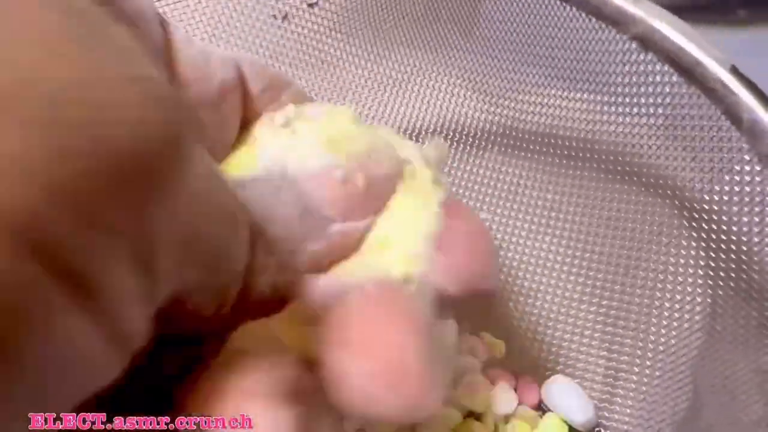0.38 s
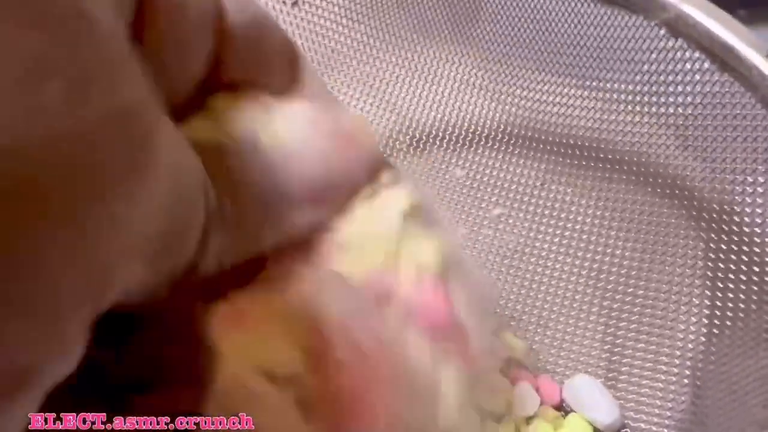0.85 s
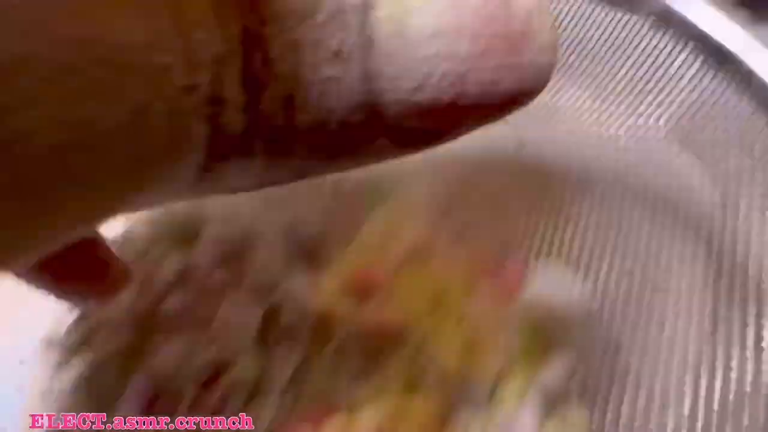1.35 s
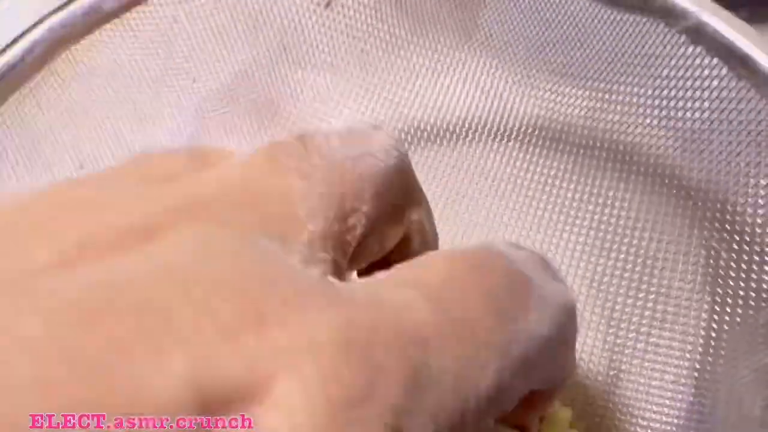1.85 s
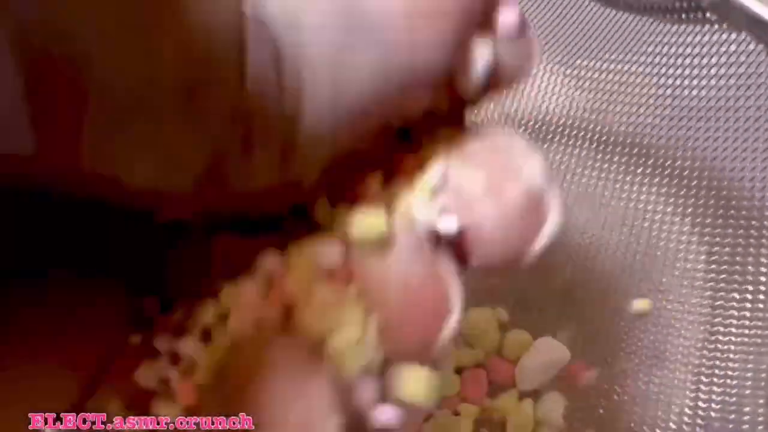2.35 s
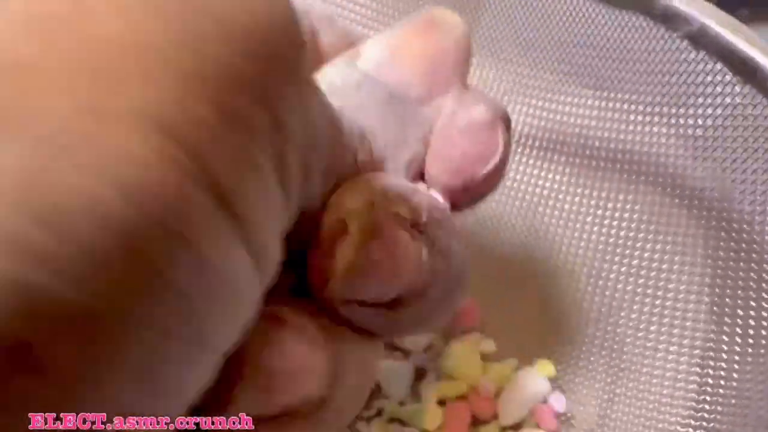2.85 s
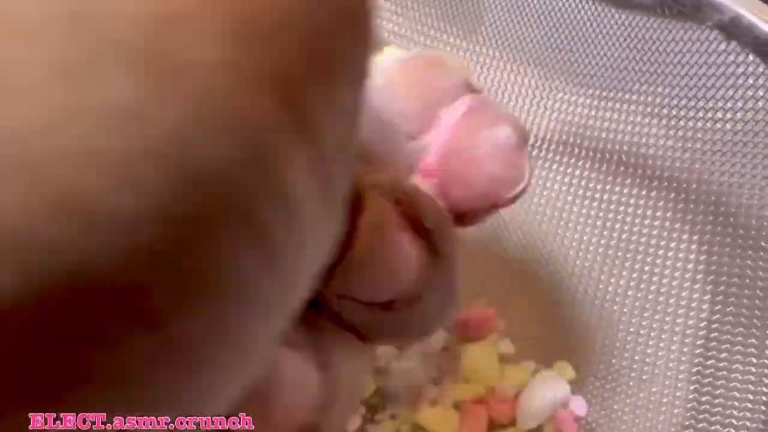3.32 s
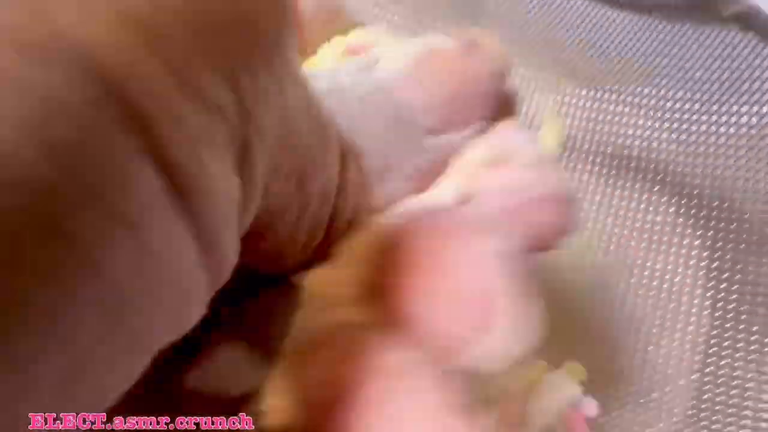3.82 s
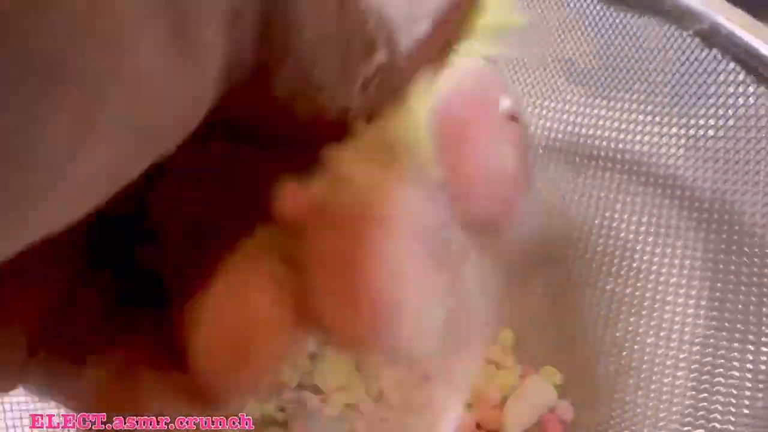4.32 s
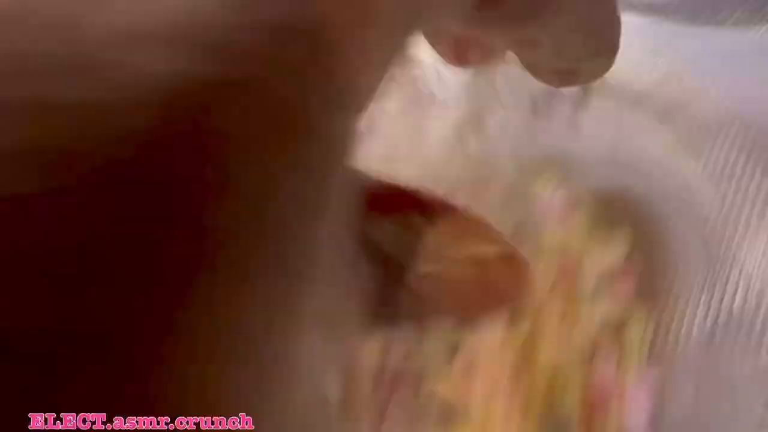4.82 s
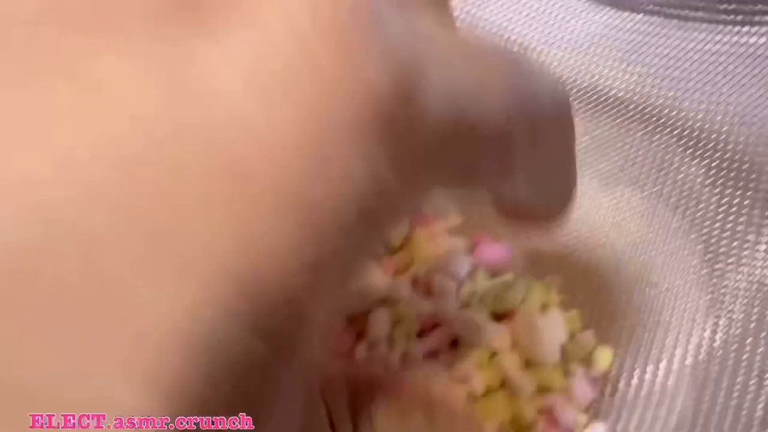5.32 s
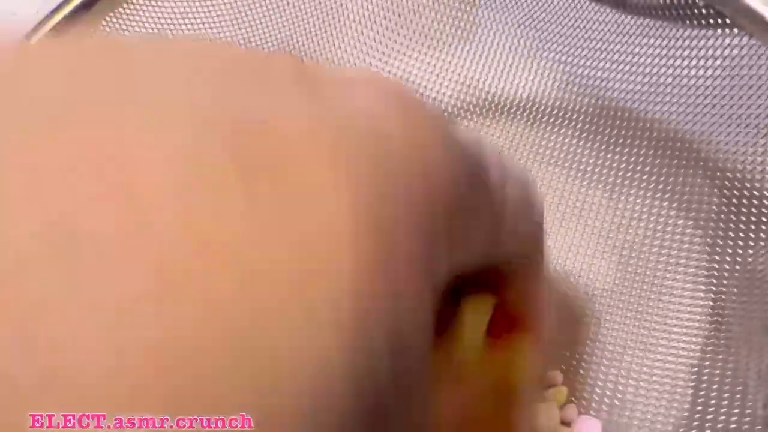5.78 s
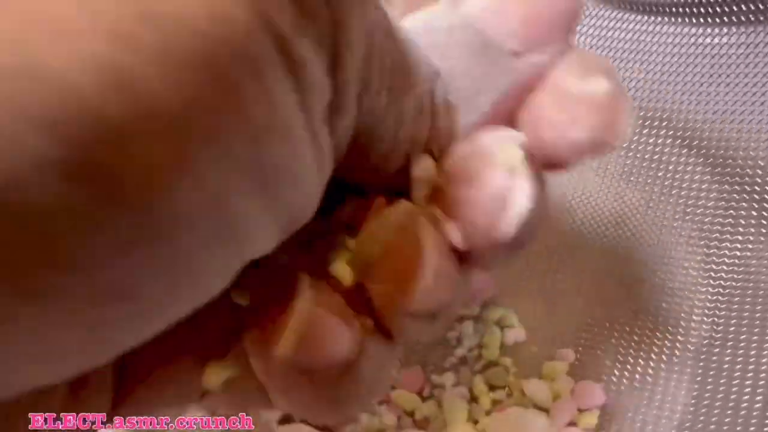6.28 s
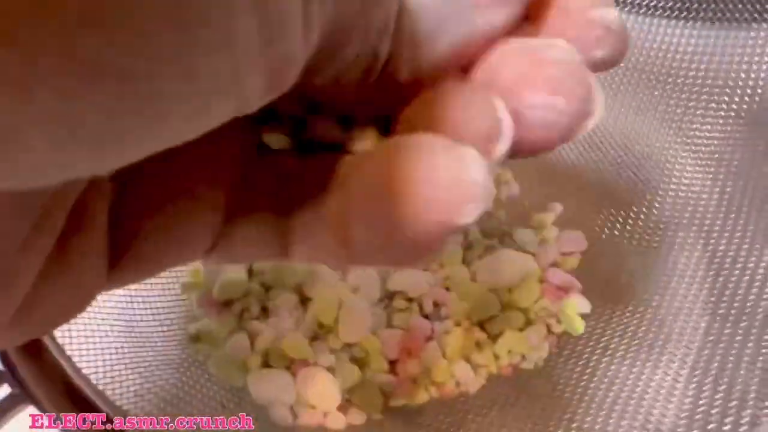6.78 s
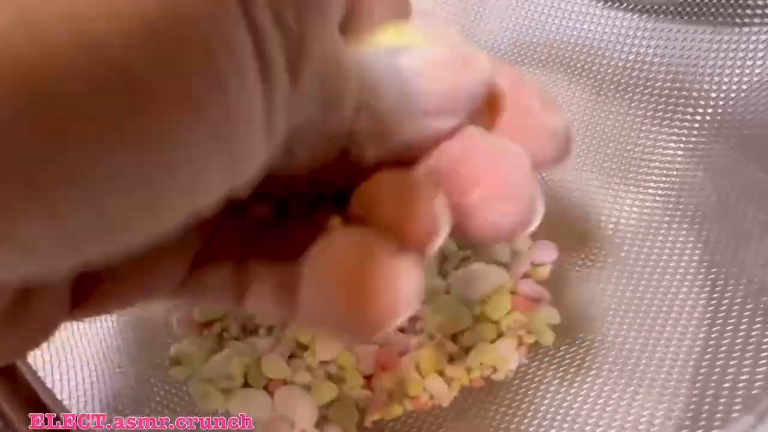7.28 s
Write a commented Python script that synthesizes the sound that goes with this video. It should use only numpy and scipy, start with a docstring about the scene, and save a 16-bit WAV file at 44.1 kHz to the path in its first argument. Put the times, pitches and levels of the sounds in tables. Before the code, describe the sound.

Very close, irregular crunches of chalky pieces crushed by fingers, mostly left, with hissing crumb showers on metal mesh and soft low bumps.

```python
"""Fingers crush dry, brittle lumps over a wire strainer close to a pair of microphones.
From the start, mains hum and a low rumble lie under crumbs pattering and sliding on the mesh (resonated clicks);
from 0.07 s single crumbs tick on the wires (noise bursts), and from 0.25 s the hand bumps the frame (damped sines).
From 0.9 s lumps crack in the hand, mostly at the left; hard showers fall near 1.4 s, dense cracks near 2.6 s.
A milder shower peaks near 4.9 s, strong cracks near 6.3 s; squeezing goes on to the end as the hum swells again."""
import sys
import numpy as np
from scipy import signal
from scipy.fft import rfft, irfft
from scipy.io import wavfile
from scipy.ndimage import uniform_filter1d, map_coordinates

SR = 44100
rng = np.random.default_rng(int(sys.argv[2]) if len(sys.argv) > 2 else 0)


def wav_record(signal):
    """Record a signal, one row per channel, as 16-bit PCM in the file named by sys.argv[1]."""
    frames = np.transpose(np.atleast_2d(signal))
    bounded = np.clip(frames, -1, 1)
    # unit amplitude maps onto the largest positive 16-bit level
    quanta = np.round(bounded * 32767).astype(np.int16)
    wavfile.write(sys.argv[1], SR, quanta)


def gain_from_decibels(decibels):
    """Convert decibel values to linear amplitude factors."""
    exponent = np.asarray(decibels, float) / 20
    return 10 ** exponent


N = 337365

# Single crumbs landing on the wires. Each row: start in seconds, snap level in dB before trim,
# level of the following scatter against it in dB.
TICKS = [(0.0673, -36, -14), (0.231, -36, -9), (0.605, -32, -30), (0.6609, -41, -11), (0.724, -39, -14),
         (1.2256, -20, -15), (1.946, -24.5, -14.5), (2.381, -27, -20), (2.484, -26.5, -29),
         (2.545, -31, -8), (2.7773, -32, -26), (2.8225, -48, -14), (2.973, -41, -13), (3.067, -31, -11),
         (3.283, -27, -15), (3.3368, -24, -30), (3.53, -45, -7.5), (3.58, -38, -21), (3.6167, -46, -19),
         (3.714, -25, -8), (3.8303, -34, -12), (4.0802, -32, -23), (4.119, -41, -18), (4.177, -41, -7),
         (4.2153, -32, -16), (4.2728, -31, -20), (4.2984, -38, -24), (4.358, -32.5, -18),
         (4.3994, -40, -10), (4.704, -40, -11), (4.8347, -26, -16), (5.3098, -42, -14),
         (5.4306, -38, -17.5), (6.0023, -38.5, -17), (6.1584, -38, -14), (6.277, -35, -25),
         (6.429, -38, -29), (6.455, -30.5, -14), (6.63, -33.5, -30), (6.9564, -34, -26.5),
         (7.008, -38, -15), (7.1755, -41, -16), (7.231, -36.5, -17), (7.532, -41.5, -4)]


def rms_one(x):
    """Scale to rms 1."""
    return x / np.sqrt(np.mean(x ** 2) + 1e-20)


def in_time(rows):
    """Interpolate each column over time, sample by sample."""
    s, *columns = np.transpose(rows)
    return [np.interp(np.arange(N) / SR, s, column) for column in columns]


def at_hz(points, hz):
    """Read a table on a log-frequency axis."""
    table_hz, value = np.transpose(points)
    return np.interp(np.log(hz), np.log(table_hz), value)


def drift(rate_hz):
    """Slow random curve with rms 1: noise through a two-pole lowpass."""
    r = np.exp(-2 * np.pi * rate_hz / SR)
    slow = signal.lfilter([1], [1, -2 * r, r * r], rng.standard_normal(N + SR))
    return rms_one(slow[SR:])   # the filter's first second is dropped


def swells(rows, rest_db, rest_value=0):
    """Events rising to a peak and falling add their power; a last column is blended by each event's share."""
    roundness = 1.6   # 1 = pointed, 2 = bell-shaped
    t = np.arange(0, N + 64, 64) / SR
    columns = np.array([(*row, 0)[:5] for row in rows]).T
    peak_s, peak_db, rise_ms, fall_ms, value = columns[:, :, None]
    late_ms = 1000 * (t - peak_s)
    distance = np.where(late_ms < 0, -late_ms / rise_ms, late_ms / fall_ms) ** roundness
    power = gain_from_decibels(2 * (peak_db - 10 * np.minimum(distance, 20)))
    rest_power = gain_from_decibels(2 * rest_db)
    total = power.sum(axis=0) + rest_power
    blend = ((power * value).sum(axis=0) + rest_power * rest_value) / total
    return [np.interp(np.arange(N) / SR, t, v) for v in (10 * np.log10(total), blend)]


def ring(clicks, hz, cycles):
    """Two-pole resonator: falls 60 dB in the given cycles, gain about 1 at its peak."""
    r, w = gain_from_decibels(-60 * hz / (cycles * SR)), 2 * np.pi * hz / SR
    b = [(1 - r * r) / 2, 0, (r * r - 1) / 2]
    a = [1, -2 * r * np.cos(w), r * r]
    return signal.lfilter(b, a, clicks + 1e-18)


def grains(spectrum, per_s, spread_db, cycles, clump_db, clump_rate_hz, count, weight_db):
    """Random clicks in clumps, each dealt to one of many small resonators; levelled to a running rms of 1."""
    sizes = gain_from_decibels(spread_db * np.minimum(rng.exponential(1, N), 4)) * rng.choice([-1, 1], N)
    struck_now = rng.random(N) < per_s / SR
    clicks = sizes * struck_now * gain_from_decibels(clump_db * drift(clump_rate_hz))
    dealt, out = rng.integers(0, count, N), 0
    for k, hz in enumerate(np.geomspace(spectrum[0][0], min(spectrum[-1][0], .4 * SR), count)):
        once = ring(clicks * (dealt == k) * gain_from_decibels(weight_db(hz)), hz, cycles)
        out = out + gain_from_decibels(at_hz(spectrum, hz)) * ring(once, hz, cycles)   # twice: soft start, dark skirts
    return out / np.sqrt(uniform_filter1d(out ** 2, size=3000) + 1e-20)


def coloured(spectrum):
    """Two unrelated smooth noises shaped by a spectrum; rms 1 overall."""
    shape = gain_from_decibels(at_hz(spectrum, np.fft.rfftfreq(N, 1 / SR) + 1))
    return rms_one(irfft(rfft(rng.standard_normal((2, N))) * shape, N))


def placed(x, other, alike, pan_db, left_lag_s):
    """Left hears x at its own time; right hears a share of x in power, the rest from an unrelated signal."""
    left = map_coordinates(x, [np.arange(N) - left_lag_s * SR], order=3)
    right = np.sqrt(alike) * x + np.sqrt(1 - alike) * other
    return np.array([left * gain_from_decibels(pan_db / 2), right * gain_from_decibels(-pan_db / 2)])


def struck(rows, cycles, trim_db, rise_s, sharp, settle_s):
    """Each hit is a damped sine starting sharp, since high bending waves arrive first, and settling in pitch."""
    out, t = np.zeros(N + SR), np.arange(1500) / SR
    for s, db, hz in rows:
        start = round(s * SR)
        turns = hz * (t + sharp * settle_s * (1 - np.exp(-t / settle_s)))
        shape = (1 - np.exp(-t / rise_s)) * gain_from_decibels(db + trim_db - 60 * t * hz / cycles)
        out[start:start + len(t)] += shape * np.sin(2 * np.pi * turns)
    return out[:N]


def hum():
    """Mains hum: a sine and its second harmonic with a slightly wavering pitch."""
    # Each row: time in seconds, rms level of the fundamental in dB before pan.
    hum_level = [(0.0, -47), (1.7, -46.5), (1.89, -44), (2.0, -49), (3.4, -60.5), (3.73, -55), (3.92, -62),
                 (4.81, -62), (4.92, -53), (5.18, -61.5), (5.35, -51.5), (6.03, -54.5), (6.29, -48.5),
                 (6.62, -51), (7.52, -45.5), (7.65, -50)]
    hum_hz, waver_hz, second_db = 59.3, 0.27, -21
    phase = 2 * np.pi * np.cumsum(hum_hz + waver_hz * drift(1.32)) / SR
    tone = np.sin(phase) + gain_from_decibels(second_db) * np.sin(2 * phase)
    pan = gain_from_decibels(np.array([[.6], [-.6]]))
    return np.sqrt(2) * gain_from_decibels(in_time(hum_level)[0]) * tone * pan


def patter():
    """Dense showers of crumbs excite the wires, which favour the high treble; harder showers are brighter."""
    # Mesh spectrum. Each row: frequency in Hz, relative level in dB.
    mesh = [(1500, -21), (3000, -19.5), (5000, -10), (6800, -5), (8500, -5.5), (9500, 0), (11500, -6.5),
            (14000, -5.5), (15800, -1.5)]
    # Crumbs falling or sliding. Each row: peak time in seconds, peak level in dB before pan,
    # rise over 10 dB in ms, fall over 10 dB in ms.
    showers = [(0.0, -52.5, 498, 106), (0.082, -50.5, 25, 16), (0.141, -51.4, 18, 66),
               (0.229, -44.5, 10, 474), (0.295, -41, 64, 34), (0.759, -48, 53, 49), (0.924, -43, 113, 26),
               (0.979, -43.5, 25, 401), (1.07, -41, 30, 14), (1.25, -25, 24, 63), (1.379, -23.5, 56, 30),
               (1.479, -25, 67, 31), (1.578, -33.5, 97, 30), (1.783, -32, 127, 52), (1.854, -26.5, 22, 55),
               (1.955, -35.5, 27, 51), (2.089, -39.5, 83, 323), (2.485, -43, 1, 43), (2.59, -39, 73, 103),
               (2.849, -49.5, 201, 82), (2.971, -48, 1, 77), (3.104, -39.5, 83, 102),
               (3.155, -47.5, 4, 184), (3.335, -36.5, 2, 12), (3.45, -53.5, 500, 42),
               (3.564, -51.1, 57, 29), (3.723, -37, 81, 49), (3.862, -43.5, 69, 25), (3.929, -51, 76, 142),
               (4.124, -55, 97, 6), (4.184, -51, 20, 134), (4.282, -48.5, 33, 18), (4.358, -52.5, 3, 189),
               (4.586, -46, 68, 39), (4.733, -50, 19, 378), (4.855, -27.5, 22.5, 167),
               (5.072, -34.5, 138, 158), (5.133, -31.5, 32, 24), (5.454, -33.5, 132, 82),
               (5.577, -37, 39, 57), (5.685, -44.5, 118, 318), (5.875, -44, 112, 64),
               (6.163, -47.5, 17, 223), (6.273, -44.5, 10, 49), (6.424, -59, 13, 149),
               (6.518, -52.5, 20, 70), (6.633, -47.7, 6, 13), (6.741, -40.5, 68, 101),
               (6.952, -51.5, 13, 36), (7.033, -51.6, 77, 71), (7.177, -56, 6, 26), (7.267, -44, 43, 127),
               (7.476, -52.5, 36, 169), (7.537, -51, 17, 20)]
    level_db, _ = swells(showers, rest_db=-80)   # stray crumbs between showers
    top_db = -4.5 + 0.18 * (level_db - level_db.max())   # weight of the top octave

    def bright(hz):
        return top_db * np.clip(np.log2(hz / 9000) / 0.31, 0, 1)

    pair = [grains(mesh, per_s=16000, spread_db=1.0, cycles=17.0, clump_db=2.5, clump_rate_hz=14.0,
                   count=24, weight_db=bright) for _ in range(2)]
    return gain_from_decibels(level_db) * placed(*pair, alike=0.073, pan_db=4.5, left_lag_s=0.00023)


def crush():
    """Small fractures coloured by the hollow of the hand, which changes as it closes; plus loud cracks."""
    # Lump spectrum. Each row: frequency in Hz, relative level in dB.
    lump = [(700, -24), (1200, -9), (2000, -6), (3500, -9), (5000, -10.5), (8000, -35)]
    # Squeezes of the fist. Each row: peak time in seconds, peak level in dB before pan,
    # rise over 10 dB in ms, fall over 10 dB in ms, centre of the hand hollow in Hz.
    squeezes = [(0.001, -55.5, 6, 84, 2772), (0.233, -46, 11, 127, 3050), (0.465, -54.5, 4, 86, 2299),
                (0.508, -56, 285, 154, 2220), (0.573, -50, 20, 38, 2308), (0.739, -58.0, 15, 102, 3000),
                (0.89, -47.5, 31.5, 46, 2920), (1.009, -50.5, 10, 87, 2520), (1.013, -60, 225, 6, 2543),
                (1.29, -51.5, 192, 43, 2760), (1.385, -44, 54, 19, 2800), (1.496, -49, 67, 107, 3357),
                (1.595, -59.3, 6, 8, 3227), (1.653, -53.5, 1, 24, 3064), (1.808, -47.5, 78, 9, 2656),
                (1.882, -45, 60, 30, 2294), (1.942, -53, 24, 41, 2278), (2.09, -50.5, 82, 10, 2944),
                (2.225, -55, 89, 206, 2670), (2.486, -50, 7, 242, 2640), (2.613, -37, 70, 69, 1910),
                (2.844, -53, 48, 115, 2180), (3.08, -41, 15, 137, 2780), (3.149, -45.5, 75, 107, 2850),
                (3.45, -57.8, 149, 54, 2894), (3.544, -61, 18, 57, 2671), (3.644, -44, 26.5, 155, 3360),
                (3.713, -40, 20, 40, 2889), (3.96, -56.1, 225, 112, 2450), (4.082, -60.6, 17, 32, 2600),
                (4.178, -61, 6, 347, 2660), (4.304, -55, 105, 6, 2000), (4.554, -53.5, 39, 62, 2300),
                (4.883, -51, 62, 27, 2883), (4.958, -59, 35, 60, 2824), (4.982, -48.5, 7, 17, 2756),
                (5.057, -55, 27, 15, 2996), (5.12, -58.5, 45, 44, 3462), (5.248, -62.5, 145, 14, 2996),
                (5.313, -56, 8, 38, 2557), (5.382, -50, 37, 270, 2397), (5.58, -49, 147, 53, 1780),
                (5.713, -54, 88, 10, 3450), (5.788, -67.2, 6, 498, 2653), (5.803, -57, 17, 93, 2727),
                (6.264, -40, 80, 84, 2100), (6.51, -56.3, 89, 78, 2590), (6.746, -40.5, 46, 112, 2600),
                (6.882, -52.5, 87, 28, 2118), (7.044, -52, 66, 57, 2723), (7.179, -67, 21, 58, 3260),
                (7.251, -45, 19.5, 130, 3022), (7.379, -48.5, 6, 31, 2250), (7.521, -54.5, 58, 109, 2340)]
    # Loud cracks of a lump. Each row: start in seconds, level in dB before trim and pan, settled pitch in Hz.
    cracks = [(0.8804, -38, 2820), (1.838, -29, 1160), (1.871, -27, 1220), (2.579, -33, 1700),
              (2.608, -27, 1650), (2.6173, -23, 1570), (2.6204, -23, 1950), (2.632, -36, 2100),
              (2.6902, -36.5, 1550), (2.6986, -37, 1570), (3.0714, -41, 2900), (3.0994, -41, 2550),
              (3.118, -30, 2930), (3.1772, -27, 2750), (3.6334, -35, 3560), (3.711, -34, 3340),
              (3.7185, -27, 3330), (4.2981, -49, 2340), (5.0476, -37, 2600), (5.371, -38, 1480),
              (6.2225, -32, 2760), (6.2494, -32, 2210), (6.2786, -22, 1630), (6.289, -28, 2200),
              (6.314, -27.5, 2800), (6.7482, -42, 3060), (6.7694, -33, 2790), (6.8573, -36, 1790),
              (7.2694, -36, 2710), (7.3796, -45, 2300)]
    # The hand moves about. Each row: time in seconds, left over right in dB.
    hand_pan = [(0.0, 9.5), (0.58, 14.5), (0.96, 13.5), (1.23, 6), (1.81, 2), (2.32, 7), (2.45, 11.5),
                (4.6, 13), (4.77, -3.5), (5.8, 5.5), (6.16, 13.5), (6.71, 12), (7.16, 16), (7.65, 14.5)]
    level_db, hollow_hz = swells(squeezes, rest_db=-82, rest_value=1900)
    pan_db, = in_time(hand_pan)
    hollow_db = 0.5 + 0.64 * pan_db   # stronger when the fist is close on the left
    octaves = np.clip(0.72 + .015 * (level_db - level_db.max()), .25, 1)   # soft rubbing is narrower

    def hollow(hz):
        return hollow_db * np.exp(-(np.log2(hz / hollow_hz) / octaves) ** 2)

    pair = [grains(lump, per_s=9000, spread_db=0.0, cycles=11.7, clump_db=2.0, clump_rate_hz=19.0,
                   count=20, weight_db=hollow) for _ in range(2)]
    snaps = struck(cracks, cycles=13.0, trim_db=5.5, rise_s=0.00032, sharp=0.49, settle_s=0.00025)
    near = gain_from_decibels(level_db) * pair[0] + snaps
    other = gain_from_decibels(level_db + 5.0) * pair[1]
    return placed(near, other, alike=0.19, pan_db=pan_db, left_lag_s=-0.00026)


def bowl():
    """The strainer bowl answers pressure with rubbing, dull knocks and a deep sway."""
    # Bowl and rumble spectra. Each row: frequency in Hz, relative level in dB.
    bowl_spectrum = [(180, -3), (300, -5.5), (500, -9), (900, -13), (1500, -11.5)]
    rumble = [(25, -12), (45, 9), (65, 12.5), (95, 16.5), (130, 12.5), (165, 8), (200, -4.5), (260, -23)]
    # Pushes on the bowl. Each row: peak time in seconds, peak level in dB before pan,
    # rise over 10 dB in ms, fall over 10 dB in ms, dullness in dB (relative cut from 800 Hz up).
    pushes = [(0.0, -65, 449, 32, 3), (0.263, -50.5, 23, 103, 0), (0.41, -57.3, 2, 79, 9),
              (0.58, -62, 44, 59, 0), (0.748, -62, 14, 72, 0), (0.929, -43.5, 6, 27, 18),
              (0.971, -57, 104, 107, 12), (1.319, -56, 19, 10, 8), (1.379, -54.5, 197, 32, -4.5),
              (1.499, -56, 89, 17, -11.5), (1.814, -47, 68, 13, -3), (1.871, -39, 32, 87, -2),
              (2.078, -62.9, 500, 110, 3), (2.204, -68.9, 16, 280, -4), (2.642, -47.5, 112, 77, -2.5),
              (2.882, -63.5, 109, 37, -7), (3.13, -45.5, 48, 15, -2), (3.159, -53.5, 85, 152, 13),
              (3.18, -46, 15, 48, 9), (3.458, -71, 25, 500, 13), (3.709, -44, 56, 63, 1),
              (3.862, -63.5, 10, 98, 7), (4.213, -71, 69, 17, -1), (4.255, -59.6, 8, 202, 2),
              (4.308, -51, 40, 8, 12.5), (4.516, -56.5, 9, 70, 9), (4.877, -53, 69, 48, -8),
              (4.971, -51.5, 31, 59, -8), (5.14, -64, 58, 19, -15), (5.469, -42.5, 92, 128, -1),
              (5.806, -65.5, 195, 197, 7), (6.096, -67, 145, 35, 14), (6.268, -43.5, 65, 77, -1),
              (6.519, -61, 78, 29, 0), (6.796, -45, 69, 71, 2), (7.053, -69.5, 136, 56, 0),
              (7.265, -55, 31, 181, 1.5), (7.377, -47.5, 0, 22, 4)]
    # Bumps on the frame. Each row: start in seconds, level in dB before trim and pan, settled pitch in Hz.
    bumps = [(0.252, -43.5, 268.7), (0.412, -39, 388), (0.931, -38, 272), (1.784, -39, 267),
             (1.852, -44, 815), (1.868, -28.5, 288), (1.88, -33, 323), (1.9, -33, 250), (1.908, -47, 250),
             (2.687, -37.5, 348), (2.699, -39, 198), (3.177, -34, 269), (3.647, -37, 520),
             (3.705, -27.5, 322), (4.258, -45, 244), (4.298, -37.5, 298), (5.37, -39.5, 264),
             (5.419, -41, 234), (5.469, -35, 205), (5.519, -41, 200), (5.559, -41, 210), (6.184, -46, 362),
             (6.245, -31.5, 380), (6.749, -35, 296), (6.794, -28, 339), (6.856, -37, 310),
             (7.379, -29, 479), (7.393, -42, 204)]
    # Deep sways. Each row: peak time in seconds, peak level in dB before pan,
    # rise over 10 dB in ms, fall over 10 dB in ms.
    sways = [(0.332, -48, 268, 11), (0.418, -55, 39, 411), (0.863, -51.5, 22, 600), (1.001, -40.5, 67, 21),
             (1.348, -49, 55, 38), (1.769, -46, 71, 382), (1.899, -39, 72, 67), (2.622, -40.5, 42, 25),
             (2.723, -54, 240, 600), (3.11, -51, 59, 35), (3.176, -49.2, 4, 204), (3.778, -46, 222, 13),
             (3.895, -55.9, 95, 15), (4.283, -45.5, 21, 58), (4.561, -50.5, 126, 26),
             (4.864, -53.6, 179, 178), (5.563, -41.5, 215, 75), (5.734, -48, 57, 21), (5.869, -52, 27, 25),
             (6.303, -51.9, 308, 284), (6.797, -51, 198, 323), (7.407, -52, 82, 257)]
    rub_db, dull_db = swells(pushes, rest_db=-72.5, rest_value=7)

    def upper(hz):
        return -dull_db * np.clip(np.log2(hz / 400), 0, 1)

    pair = [grains(bowl_spectrum, per_s=1800, spread_db=3.5, cycles=8.8, clump_db=4.0, clump_rate_hz=29.0,
                   count=12, weight_db=upper) for _ in range(2)]
    knocks = struck(bumps, cycles=12.8, trim_db=-1.0, rise_s=0.0002, sharp=5.74, settle_s=0.001295)
    near = gain_from_decibels(rub_db) * pair[0] + knocks
    other = gain_from_decibels(rub_db + 6.0) * pair[1]
    sway_db, _ = swells(sways, rest_db=-58.5)   # low rumble between sways
    sway = gain_from_decibels(sway_db) * coloured(rumble)
    return (placed(near, other, alike=0.49, pan_db=8.0, left_lag_s=-0.00032)
            + placed(*sway, alike=0.83, pan_db=4.0, left_lag_s=0))


def ticks(level_db, t60_s, low_hz):
    """Wire buzz when a crumb lands: decaying noise bursts, highpassed, with a resonance at 8300 Hz."""
    out, t = np.zeros(N + SR), np.arange(5000) / SR
    rise = 1 - np.exp(-t / 0.00049)
    for (s, *_), db in zip(TICKS, level_db):
        start = round(s * SR)
        out[start:start + len(t)] += rise * gain_from_decibels(db - 60 * t / t60_s) * rng.standard_normal(len(t))
    bright = signal.sosfilt(signal.butter(2, low_hz, "high", fs=SR, output="sos"), out[:N])
    bright = signal.sosfilt(signal.butter(1, 11000, fs=SR, output="sos"), bright)
    buzz = bright + 2.23 * ring(bright, 8300, cycles=20.0)
    return buzz * gain_from_decibels(np.array([[1.2], [-1.2]]))


def joined_treble(x):
    """Above 8 kHz the right channel repeats the left with a phase lead that climbs in steps."""
    # Lead of right over left. Each row: frequency in Hz, lead in turns.
    treble_lead = [(8000, 0), (8800, 0), (9700, .5), (10600, .5), (11300, 1), (12800, 1), (13200, 1.5),
                   (14400, 1.5), (15200, 2)]
    left, right = rfft(x)
    hz = np.fft.rfftfreq(N, 1 / SR) + 1
    top = hz > treble_lead[0][0]
    led = left * np.exp(2j * np.pi * at_hz(treble_lead, hz))
    right[top] = led[top]
    return irfft([left, right], N)


def scene():
    """Hum, crumbs, cracks and bowl at the two microphones."""
    _, snap_db, scatter_db = np.transpose(TICKS)
    snaps = ticks(snap_db - 5.0, t60_s=0.021, low_hz=4030)
    scatter = ticks(snap_db + scatter_db, t60_s=0.069, low_hz=1790)   # fragments that follow each crumb
    steady = patter() + crush() + scatter
    return hum() + joined_treble(steady) + bowl() + snaps


def roll_off(x):
    """The treble ends steeply here."""
    return signal.sosfilt(signal.butter(12, 17010, fs=SR, output="sos"), x)


def record(dry):
    """A steep lowpass cuts the top, 50 dB down from 16.6 kHz."""
    mix = signal.sosfilt(signal.cheby2(10, 50, 16600, fs=SR, output="sos"), dry)
    return roll_off(mix)


dry = scene()
out = record(dry)
wav_record(out)
```